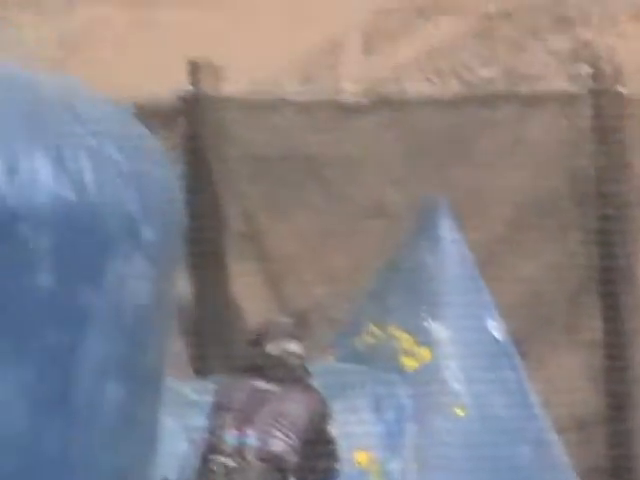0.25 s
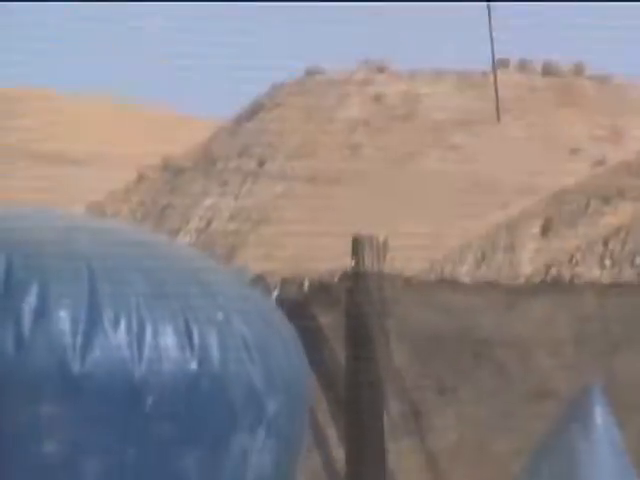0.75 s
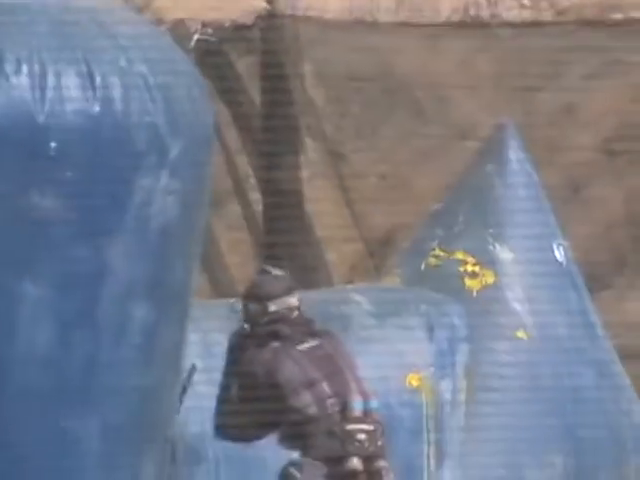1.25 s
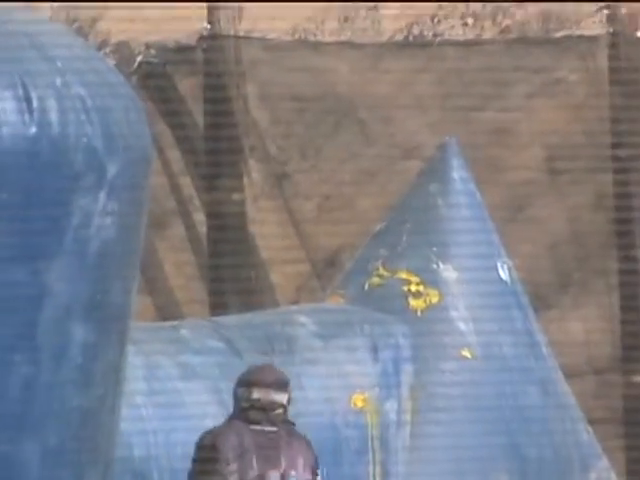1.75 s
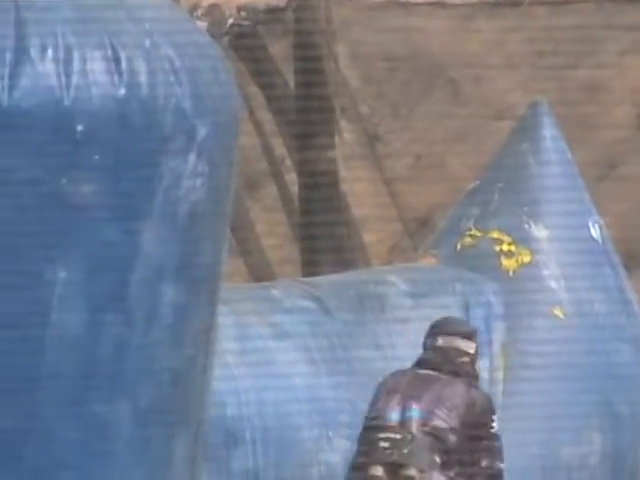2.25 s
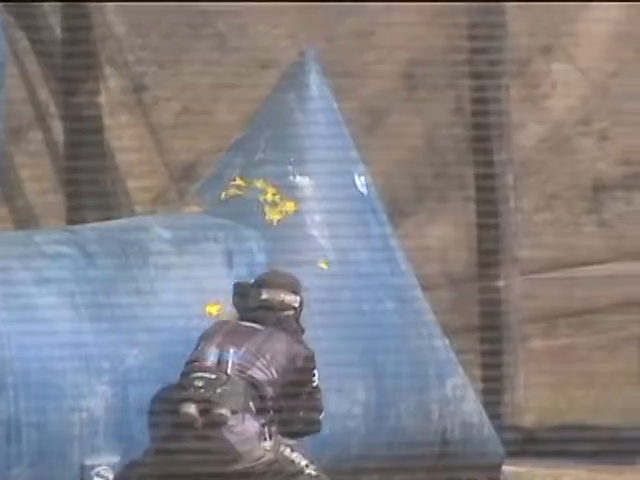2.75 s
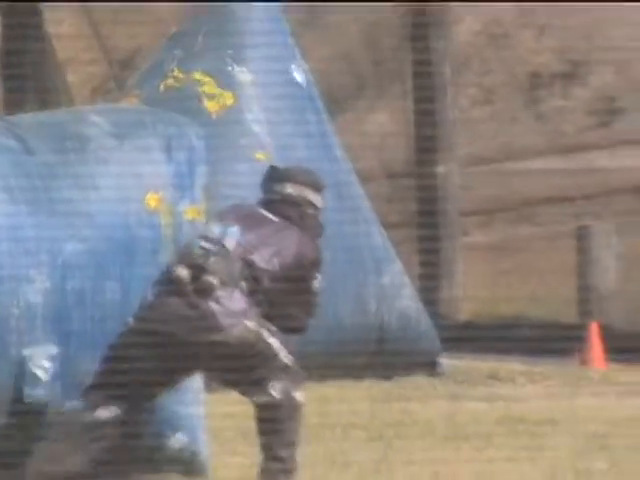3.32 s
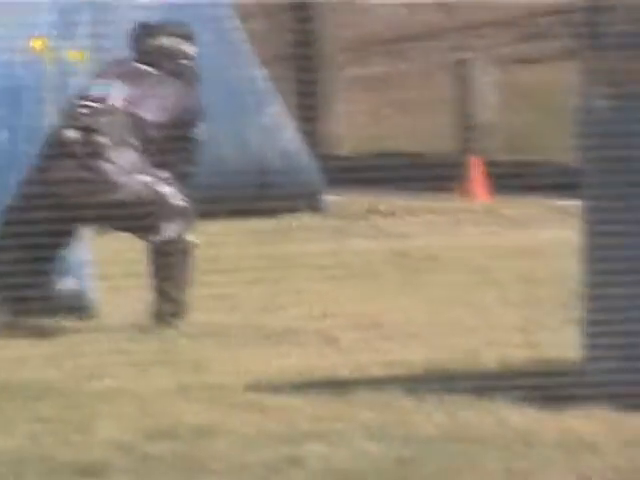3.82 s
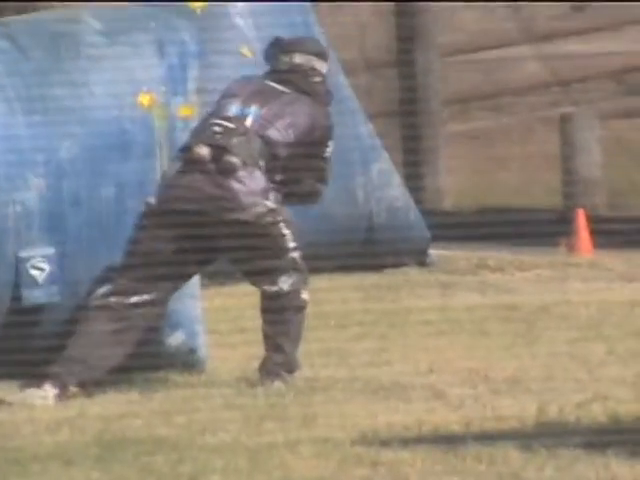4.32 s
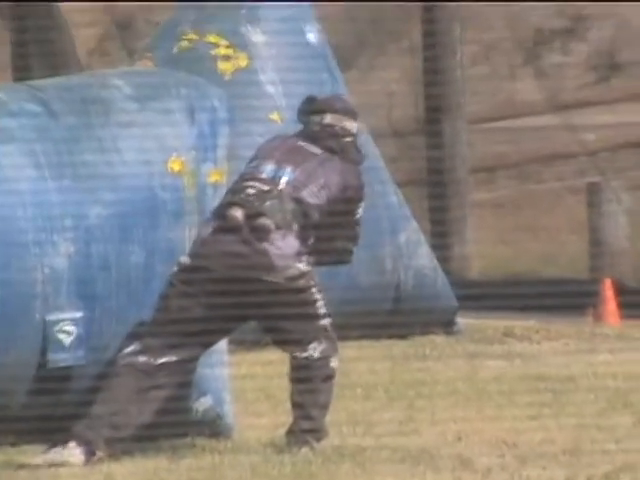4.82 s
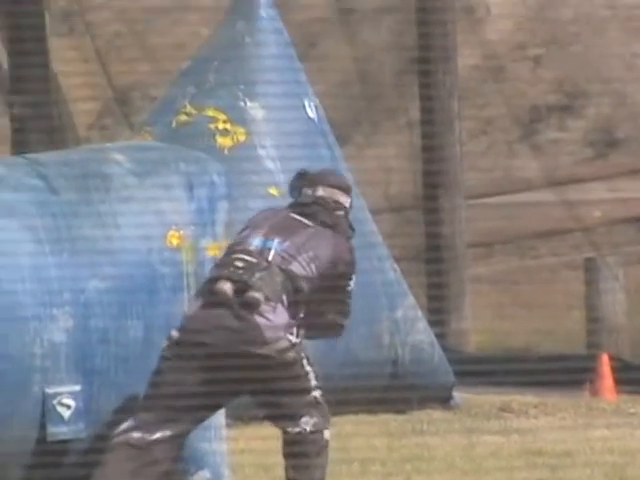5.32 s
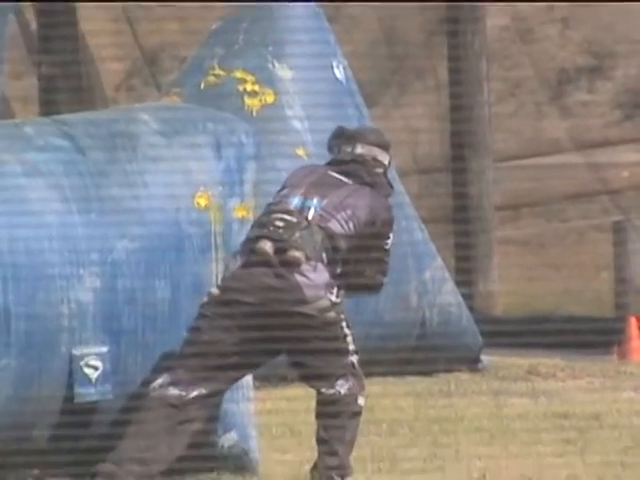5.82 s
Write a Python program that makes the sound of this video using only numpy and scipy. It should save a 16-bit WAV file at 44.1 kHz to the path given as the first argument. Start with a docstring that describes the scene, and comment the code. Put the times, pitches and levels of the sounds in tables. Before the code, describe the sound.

An outdoor paintball exchange over a steady soft wash and faint high microphone hiss. The ring of earlier play fades during the first second, with light shots at 0.1 and 0.4, slaps on inflatable bunkers at 0.1, 0.4 and 0.6, and tiny netting ticks near 0.45. From 1.2 to 2.3 a near marker fires about a dozen dry, cracking pops; several balls thump bunkers, the hits around 1.5 ringing hollow and swelling back from a fence. Softer distant pops continue from 2.1 to 2.8. At 3.0 a hissier marker with strong slapback begins; from 3.4 to 3.75 the near marker joins amid crowded thumps, which continue to 3.95. After a short gap, shots and hard slaps resume from 4.3 to 5.1, one big hollow hit at 5.0. Then mostly quiet, with two ticks near 5.3, a very faint hit at 5.9, and loud shots around 6.0.

```python
"""Rapid strings of paintball shots from three markers on an open field, with balls thumping into inflatable bunkers.
Each shot is filtered noise for bolt and gas, plus damped sines for barrel and metal; a bunker throws it back.
Each thump is a short pressure pulse, a wobbling skin and ringing air inside, and it swells back off a fence.
Stray balls tick on netting; a thin tail of reflections, a steady outdoor wash and hiss lie underneath."""
import sys
import numpy as np
from scipy import signal
from scipy.fft import rfft, irfft
from scipy.io import wavfile

SR = 44100
rng = np.random.default_rng(int(sys.argv[2]) if len(sys.argv) > 2 else 0)


def log_audio(samples):
    """Write samples as a 16-bit WAV file to the path given in sys.argv[1]."""
    # one column per channel
    frames = np.atleast_2d(samples).T
    # limit to full scale, then quantise
    limited = np.clip(frames, -1, 1)
    pcm = np.round(limited * 32767).astype(np.int16)
    wavfile.write(sys.argv[1], SR, pcm)


N = 267687  # length [samples]

# In all tables "fall" is the time a sound takes to die by 60 dB; levels are relative.
# Balls striking bunkers: (time [s], strength [dB], contact [ms], ring of the air inside [dB])
BUNKER_HITS = [ (.1060, -8.5, 0.12, -15), (.3670, -18, 0.12, -20), (0.6032, -4.5, 0.097, -14),
               (1.1825, -6, .21, -13.5), (1.4796, -7.5, 0.093, -2), (1.5353, -5.5, 0.14, 3),
               (1.566, -11.5, 0.069, -2.5), (1.855, -13, 0.28, -11), (1.9222, -11.5, 0.069, -7.5),
               (2.9714, -3, 0.34, 0), (3.171, -7, 0.43, -14.5), (3.3863, -17, 0.43, -18),
               (3.473, -7.5, 0.67, -10.5), (3.5257, -12.5, 0.67, -17), (3.576, -9, 0.077, -9),
               (3.584, -9, 0.092, -11), (3.6378, -11, 0.53, -13), (3.6934, -3, .1, -6.5),
               (3.7538, -12, 0.25, -8), (3.8279, -4.5, 0.53, -9.5), (3.9566, -3, .11, -10.5),
               (4.2777, -8.5, 0.23, -12.5), (4.5840, -2.5, 0.086, -12), (4.6623, -3, 0.16, -12),
               (4.741, -5, 0.095, -14), (4.8128, -8.5, 0.18, -17.5), (5.0276, -1.5, 0.17, -2),
               (5.11, -2, 0.089, -13), (5.8671, -30, 0.13, -44)]
# Colour of rushing gas: (frequency [Hz], level [dB per Hz])
GAS_COLOUR = [(180, -24), (300, -5), (656, -6.5), (994, -3), (1430, -1.5), (2280, -5), (2840, -1.5),
              (4300, -10.5), (4830, -7.5), (6000, -13), (8640, -17.5), (9240, -21), (12500, -22),
              (14500, -29.5), (16000, -35)]
# Ring of the air inside a bunker: (frequency [Hz], level [dB per Hz], fall [s])
INSIDE_AIR = [(40, -34, .26), (101, -4, 0.36), (169, -2.5, 0.19), (289, 16, .13), (404, 1.5, 0.21),
              (614, 7, 0.17), (1060, 8.5, .17), (1450, 2.5, .25), (2170, -4, 0.37), (2900, -12.5, 0.4),
              (3900, -19, 0.4), (6800, -34, 0.41), (15000, -58, .33)]


def markers():
    """Three markers fire, each with its own voice: the named settings that shot() takes."""
    # The near marker, equally loud every time: shot times (time [s])
    near_times = [1.1866, 1.2546, 1.3425, 1.4212, 1.5811, 1.7068, 1.7706, 1.8336, 1.9944, 2.0556, 2.1162,
                  2.1806, 2.2491, 2.3318, 3.3737, 3.4348, 3.51, 3.5983, 3.6703, 3.734, 4.6544, 4.7258,
                  4.8111, 5.9684, 6.032]
    # Voice of the near marker, with a strong crack and a weaker echo: settings by name [dB, ms, Hz]
    near_voice = dict(front_db=-2, jet_db=4, fade_ms=1.92, tilt_db=-1, hiss_db=-7.5, pop_db=1, echo_ms=11.5, echo_db=-13.5, cut_hz=840, bolt_db=-6)
    # The second marker: (time [s], level [dB])
    hissy_shots = [(.1323, -7), (.3800, -5.5), (1.1726, -2.5), (1.3462, -2.5), (2.9685, 0.5), (3.1625, 3.5),
                   (3.2514, 1.5), (3.3782, 2.5), (3.4875, 0), (3.6312, -0.5), (3.7365, 4), (3.7480, -6.5),
                   (4.2698, 2), (4.3745, -1), (4.4483, 0.5), (4.5230, 1.5), (4.5912, 0.5), (4.7031, 1),
                   (4.9014, 1), (4.9882, 0), (6.0652, 3)]
    # Voice of the second marker, with a longer, brighter jet and a strong echo: settings by name [dB, ms, Hz]
    hissy_voice = dict(front_db=-12, jet_db=5, fade_ms=3, tilt_db=2.5, hiss_db=-7.5, pop_db=-0.5, echo_ms=16, echo_db=-3.5, cut_hz=680, bolt_db=-9.5)
    # The far marker: (time [s], level [dB])
    far_shots = [(2.0633, -5), (2.3069, -8), (2.4811, -11), (2.5522, -11.5), (2.5918, -13), (2.6608, -12),
                 (2.7460, -13.5), (2.8018, -9.5)]
    # Voice of the far marker, a short tick and pop with no bolt: settings by name [dB, ms, Hz];
    # its hollow knock: (frequency [Hz], level [dB], fall [s])
    far_voice = dict(front_db=-7.5, jet_db=4.5, fade_ms=1, tilt_db=2.5, hiss_db=-7.5, pop_db=7.5, echo_ms=16, echo_db=-21, cut_hz=610, knock=[(334, -30, 0.062),
                 (565, -23, 0.023), (740, -16, .02)])
    near_db = -1
    near_shots = [(s, near_db) for s in near_times]
    return marker(near_shots, near_voice) + marker(hissy_shots, hissy_voice) + marker(far_shots, far_voice)


def marker(shots, voice):
    """One marker fires its strings, every shot in the same voice."""
    out = np.zeros((2, N))
    for s, level_db in shots:
        for delay_s, sound in shot(**voice):
            add(out, s + delay_s, undb(level_db) * sound)
    return out


def shot(front_db, jet_db, fade_ms, tilt_db, hiss_db, pop_db, echo_ms, echo_db, cut_hz, bolt_db=-np.inf, knock=()):
    """Bolt clicks, gas cracks and hisses out, barrel pops, a bunker throws it back: list of (delay [s], sound)."""
    # The barrel's pop: (frequency [Hz], level [dB], fall [s])
    barrel = [(227, -15.5, 0.025), (183, -38, 0.17), (288, -34.5, 0.12)]
    # The marker's metal body and bore: (frequency [Hz], level [dB], fall [s])
    metal = [(1095, -33, 0.056), (1453, -21.5, 0.018), (2835, -33.5, 0.03), (3390, -37, 0.047),
             (5070, -48.5, 0.026), (12900, -23, 0.005)]
    bolt_lead_s = 0.0026  # the bolt closes this long before the gas comes
    t = np.arange(4096) / SR

    jet = undb(jet_db) * burst(t, fade_ms, side_db=-15.5) * ragged(t, rate_hz=1460, depth_db=5.0)
    jet[:, 0] -= undb(front_db)  # the shock front as the ball leaves
    hiss = undb(hiss_db) * colour(burst(t, fade_ms=21, side_db=-3.0), GAS_COLOUR, tilt_db - 1.0)
    # A narrow bore radiates little below cut_hz
    gas = low_cut(colour(jet, GAS_COLOUR, tilt_db) + hiss, cut_hz, order=4)

    pop_rise = 1 - np.exp(-(t / 0.0026) ** 2)
    pop = undb(pop_db) * modes(barrel, t, scatter=0.074) * pop_rise
    clank = modes(metal, t, scatter=0.0094)
    body = low_cut(pop + clank + modes(knock, t, scatter=0.087), 81, order=2)

    click = colour(burst(t, fade_ms=1.03, side_db=-20), GAS_COLOUR, tilt_db - 1.2)
    bolt = undb(bolt_db) * low_cut(click, cut_hz, order=2)
    echo = undb(echo_db) * colour(burst(t, fade_ms=3.7, side_db=-12), GAS_COLOUR, tilt_db + 0.89)
    return [(-bolt_lead_s, bolt), (0, gas + body), (echo_ms / 1000, echo)]


def bunkers():
    """A ball slaps the taut skin, which springs back and wobbles; the sound bounces on in the air inside."""
    # The bunker's skin: (frequency [Hz], level [dB], fall [s])
    skin = [(207.4, -4.5, 0.048), (160.7, -13.5, 0.13), (261.8, -17, 0.1), (603, -13.5, 0.036)]
    # Standing waves inside a bunker: (frequency [Hz], level [dB], fall [s])
    standing = [(278.6, -33, 0.35), (531.3, -21.5, 0.12), (1052, -35, 0.64), (1170, -27, 0.29)]
    # The whole bunker heaving on its tethers: (frequency [Hz], level [dB], fall [s])
    tethers = [(24, -11, 0.2), (42, -4, 0.09), (74, -18.5, 0.1)]
    # Slap level at the reference contact time; longer contacts slap less
    base_slap_db, reference_ms, db_per_doubling = 4, 0.086, -3.5
    # The heave grows this many dB per dB of strength and of ring, so mostly heavy hits show it
    base_heave_db, heave_growth = -6.5, 4.5
    lead_s = 0.002  # the pulse starts to build this long before its peak
    out, t = np.zeros((2, N)), np.arange(20480) / SR
    for s, strength_db, contact_ms, ring_db in BUNKER_HITS:
        slap_db = strength_db + base_slap_db + db_per_doubling * np.log2(contact_ms / reference_ms)
        heave_db = base_heave_db + heave_growth * (strength_db + ring_db)
        slap = push(t - lead_s, contact_ms)
        shell = colour(burst(t[:2048], fade_ms=0.9, side_db=-10), GAS_COLOUR)
        wobble = low_cut(modes(skin, t, scatter=0.068), 80)
        heave = low_cut(modes(tethers, t, scatter=0.11), 18)

        bounces = tail(INSIDE_AIR, t, side_db=-18.0, tilt_db=-1) * ragged(t, rate_hz=440, depth_db=1.5)
        ring_rise = 1 - np.exp(-t / 0.0019)
        ring = (undb(16.5) * bounces + modes(standing, t, scatter=0.0129)) * ring_rise

        add(out, s - lead_s, undb(slap_db) * slap)
        # The first bounce inside comes back inverted
        add(out, s - lead_s + 0.002175, -undb(ring_db - 7) * slap)
        add(out, s, undb(slap_db - 8.5) * shell)  # the ball's shell bursts
        add(out, s + 0.00016, -undb(strength_db - 1.0) * wobble)
        add(out, s + 0.001045, undb(ring_db) * ring)
        add(out, s, undb(heave_db) * heave)
    return out


def push(t, contact_ms):
    """The pressure pulse of a ball's brief contact; a small patch of skin radiates little bass."""
    pulse = np.exp(-(1000 * t / max(contact_ms, 0.05)) ** 2 / 2)
    return low_cut(pulse, 60)


def fence():
    """Every thump swells back off the same fence, louder when the air in the bunker rang louder."""
    # The fence's bright wash: (frequency [Hz], level [dB per Hz], fall [s])
    fence_colour = [(400, -19, 0.54), (990, 2, 0.36), (1580, 2, 0.71), (2780, -5, 0.89), (3350, -7, 0.81),
                    (4080, -17, 0.83), (6940, -27, 0.55), (15000, -49, .3)]
    wash_db, rise_s = 11, 0.044  # the level is added to each hit's ring level
    out, t = np.zeros((2, N)), np.arange(32768) / SR
    swell = 1 - np.exp(-(t / rise_s) ** 2)
    wash = tail(fence_colour, t, side_db=-13) * swell * ragged(t, rate_hz=180, depth_db=2.0)
    for s, _, _, ring_db in BUNKER_HITS:
        add(out, s, undb(wash_db + ring_db) * wash)
    return out


def netting():
    """Stray balls tick on the netting: thin, bright bursts of noise."""
    # Ticks: (time [s])
    tick_times = [0.4356, 0.465, 2.9406, 2.9543, 3.069, 3.1500, 3.2384, 3.3481, 4.0007, 4.2140, 4.358,
                  5.2563, 5.3083]
    tick_db = -15
    out, t = np.zeros((2, N)), np.arange(1024) / SR
    for s in tick_times:
        tick = colour(burst(t, fade_ms=1.8, side_db=-5.5), GAS_COLOUR, tilt_db=3.5)
        add(out, s, undb(tick_db) * tick)
    return out


def field(direct, wet_db):
    """Fence, bunkers and hillside scatter a thin, uneven tail."""
    # The field's tail: (frequency [Hz], level [dB per Hz], fall [s])
    field_colour = [(59.6, -12, 1), (248, -1, 0.56), (634, -6.5, 0.96), (1300, -4, 1), (2800, -5.5, 1),
                    (6200, -4, 0.76), (15100, -3, 0.28)]
    t = np.arange(48000) / SR
    rise = 1 - np.exp(-t / 0.0013)
    response = tail(field_colour, t, side_db=-2.5) * rise * ragged(t, rate_hz=200, depth_db=2.5)
    mono = direct.mean(axis=0)[None]
    return undb(wet_db) * signal.fftconvolve(mono, response, axes=1)[:, :N]


def air(early_db, fade_s, hiss_db):
    """Steady outdoor wash and microphone hiss, with the ring of earlier play dying away at first."""
    # The outdoor wash: (frequency [Hz], level [dB per Hz])
    outdoor_colour = [(18, -30), (30, -8.5), (187, 2), (489, 0), (726, 0.5), (1350, -3.5), (1950, -2.5),
                      (2260, -6.5), (2560, -4), (3990, -14), (5110, -16.5), (5930, -17.5), (11000, -26),
                      (14300, -40), (22000, -120)]
    # The microphone hiss: (frequency [Hz], level [dB per Hz])
    hiss_colour = [(8000, -17), (11000, -12.5), (12000, 2), (15300, -3), (16200, -5)]
    wash_db = -49
    t = np.arange(N) / SR
    earlier_ring = colour(noise(N, side_db=-3), INSIDE_AIR, tilt_db=7.5)
    dying = undb(early_db) * np.exp(-t / fade_s) * earlier_ring
    wash = undb(wash_db) * colour(noise(N, side_db=-1, apart_hz=40), outdoor_colour)
    hiss = undb(hiss_db) * colour(noise(N, side_db=0), hiss_colour)
    return wash + dying + hiss


def burst(t, fade_ms, side_db):
    """A puff of turbulent gas: fading noise with unit energy, averaged over the two sides."""
    puff = noise(len(t), side_db) * np.exp(-1000 * t / max(fade_ms, 0.2))
    return puff / np.sqrt(np.sum(puff ** 2) / 2)


def modes(table, t, scatter):
    """Damped sines, a little differently tuned at every blow."""
    total = 0
    for hz, level_db, fall_s in table:
        tuned_hz = hz * (1 + scatter * rng.standard_normal())
        decay = np.exp(-np.log(1000) * t / fall_s)
        total = total + undb(level_db) * np.sin(2 * np.pi * tuned_hz * t) * decay
    return total


def tail(table, t, side_db, tilt_db=0):
    """Dense reflections of unit energy: third-octave bands of noise, each dying at its own rate."""
    centres = 31.25 * 2 ** (np.arange(28) / 3)  # [Hz]
    numbers = np.arange(len(centres))
    hz = np.fft.rfftfreq(len(t), 1 / SR)
    place = np.interp(np.log(hz + 1), np.log(centres), numbers)
    bands = np.maximum(1 - abs(place - numbers[:, None]), 0)  # overlapping triangles
    gains = undb(lookup(table, centres) + tilt_db * np.log2(centres / 1000))  # tilt in dB per octave
    falls_s = lookup(table, centres, axis=2)
    spectrum = rfft(noise(len(t), side_db))
    out = np.zeros((2, len(t)))
    for gain, band, fall_s in zip(gains, bands, falls_s):
        out += gain * irfft(spectrum * band, len(t)) * np.exp(-np.log(1000) * t / fall_s)
    return out / np.sqrt(np.sum(out ** 2) / 2)


def ragged(t, rate_hz, depth_db):
    """A gain that wanders between random levels, as eddies and reflections come in clusters."""
    steps = rng.standard_normal(512)
    gain = undb(depth_db * np.interp(t * rate_hz, np.arange(len(steps)), steps))
    return gain / np.sqrt(np.mean(gain ** 2))


def noise(n, side_db, apart_hz=2500):
    """Stereo noise; the two sides differ mainly above apart_hz."""
    mid, side = rng.standard_normal((2, n))
    width = undb(side_db)
    side = width * low_cut(side, apart_hz)
    return np.array([mid + side, mid - side]) / np.hypot(1, width)


def colour(x, spectrum, tilt_db=0):
    """Filter without pre-echo: the spectrum at unit power gain, then tilted about 4 kHz [dB per octave]."""
    size = 2048
    hz = np.maximum(np.fft.rfftfreq(size, 1 / SR), 20)
    gain = undb(lookup(spectrum, hz))
    gain = gain / np.sqrt(np.mean(gain ** 2)) * undb(tilt_db * np.log2(hz / 4000))
    # Folding the cepstrum (spectrum of the log gain) gives a minimum-phase filter
    cepstrum = irfft(np.log(gain + 1e-9))
    fold = np.r_[1, np.full(size // 2 - 1, 2), 1, np.zeros(size // 2 - 1)]
    response = irfft(np.exp(rfft(cepstrum * fold)))
    return signal.fftconvolve(x, response[None], axes=1)[:, :x.shape[1]]


def low_cut(x, hz, order=1):
    """Butterworth high-pass: weakens what lies below hz."""
    return signal.sosfilt(signal.butter(order, hz, "high", fs=SR, output="sos"), x)


def lookup(table, hz, axis=1):
    """One column of a table of frequencies, joined by straight lines on a log frequency axis."""
    table = np.array(table)
    return np.interp(np.log(np.maximum(hz, 1)), np.log(table[:, 0]), table[:, axis])


def undb(db):
    """Decibels to gain."""
    return 10 ** (np.asarray(db) / 20)


def add(out, s, sound):
    """Mix a sound in from time s [s]."""
    i = max(int(round(s * SR)), 0)
    n = max(min(sound.shape[-1], N - i), 0)
    out[:, i:i + n] += sound[..., :n]


def scene():
    """Shots, hits and ticks on the open field, with their reflections and the outdoor air."""
    direct = markers() + bunkers() + netting()
    background = air(early_db=-31.5, fade_s=0.44, hiss_db=-56)
    return direct + fence() + field(direct, wet_db=-13) + background


def record(dry):
    """Two microphone ports differ in level and phase with pitch; peaks beyond full scale clip; the top is cut."""
    # The ports: (frequency [Hz], left minus right [dB], left's lead [radians])
    port_differences = [(60, -4, 0.2), (248, -2, 0.4), (500, 0, 0.32), (1000, 0, 0.18), (2050, -1.1, -0.5),
                        (4530, -2.5, 0.8), (7300, 2.1, -1.39), (15000, -1, -0.15)]
    top_hz = 15900
    hz = np.fft.rfftfreq(N, 1 / SR)
    half_db = lookup(port_differences, hz) / 2
    lead = lookup(port_differences, hz, axis=2)
    ports = np.array([undb(half_db), undb(-half_db) * np.exp(-1j * lead)])
    clipped = np.clip(irfft(rfft(dry) * ports, N), -1, 1)
    return signal.sosfilt(signal.ellip(8, 0.2, 80, top_hz, fs=SR, output="sos"), clipped)


dry = scene()
out = record(dry)
log_audio(out)
```